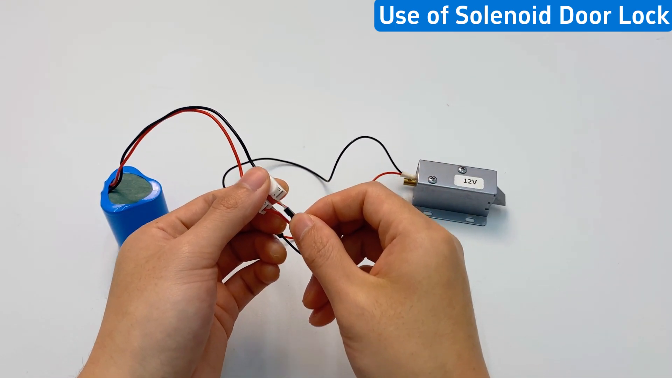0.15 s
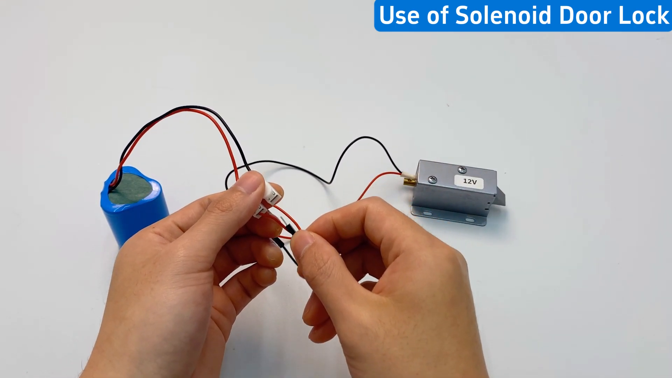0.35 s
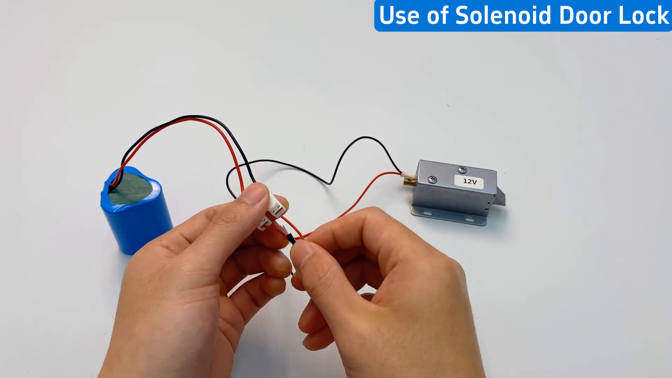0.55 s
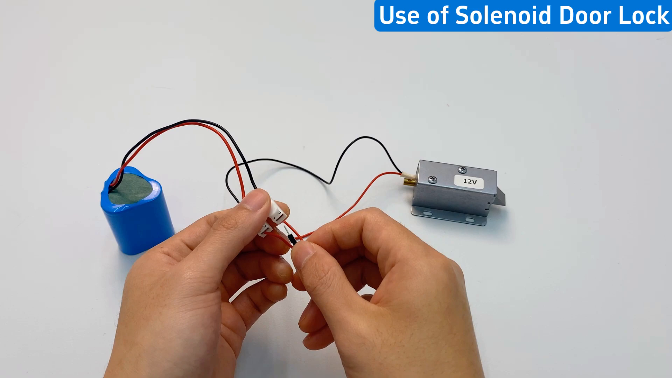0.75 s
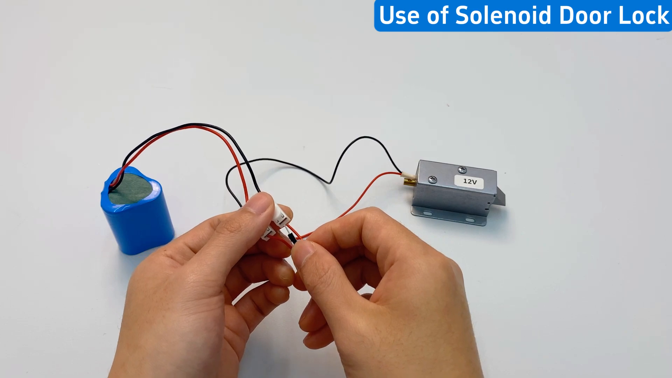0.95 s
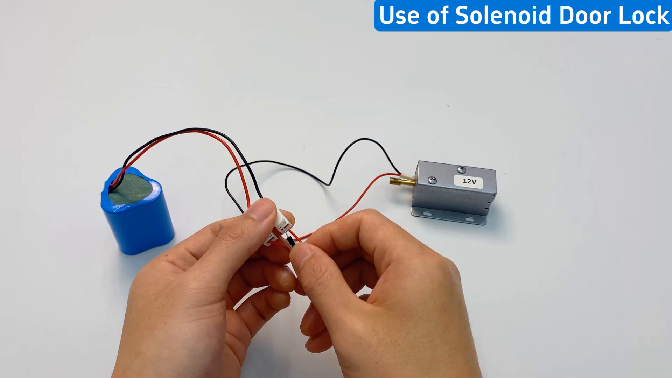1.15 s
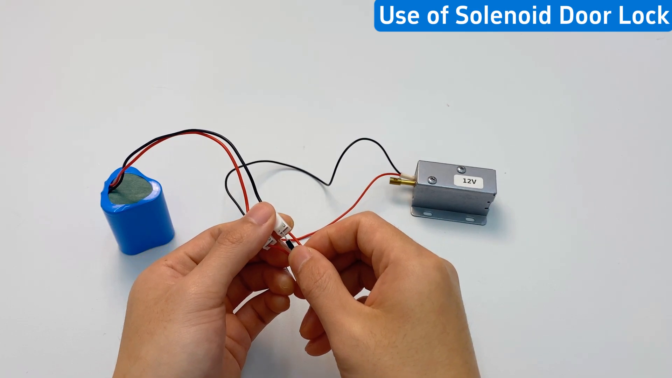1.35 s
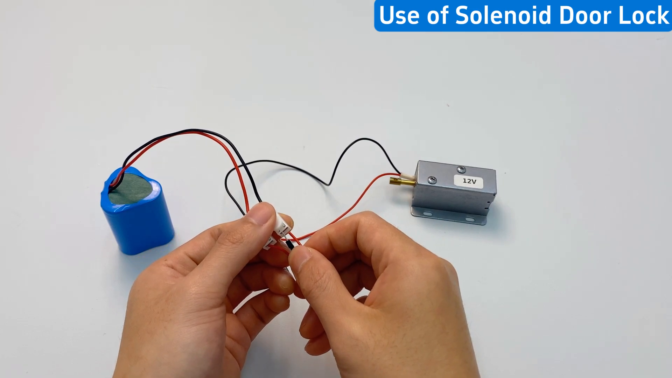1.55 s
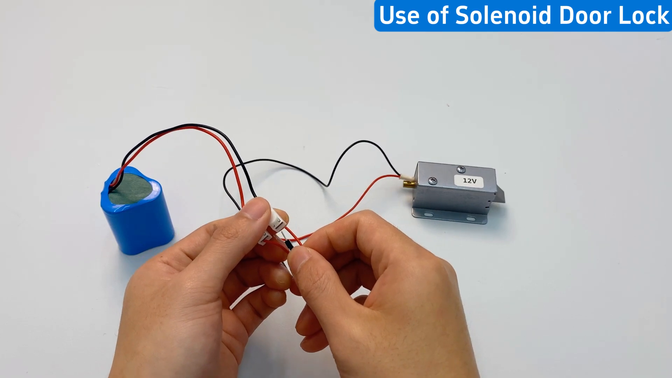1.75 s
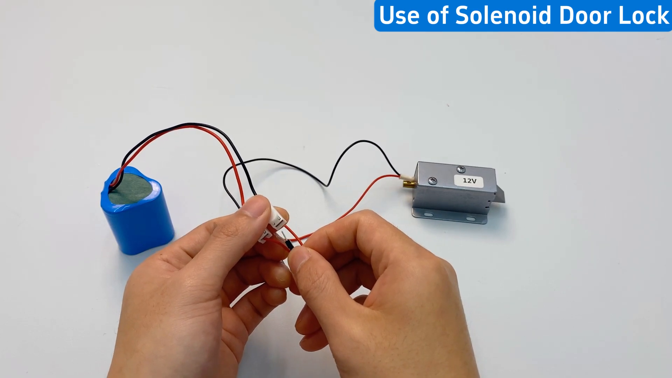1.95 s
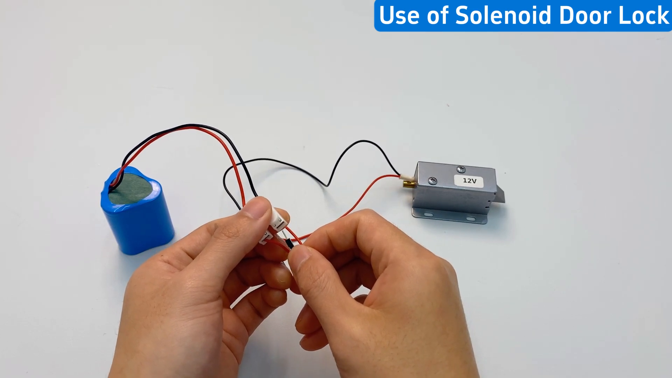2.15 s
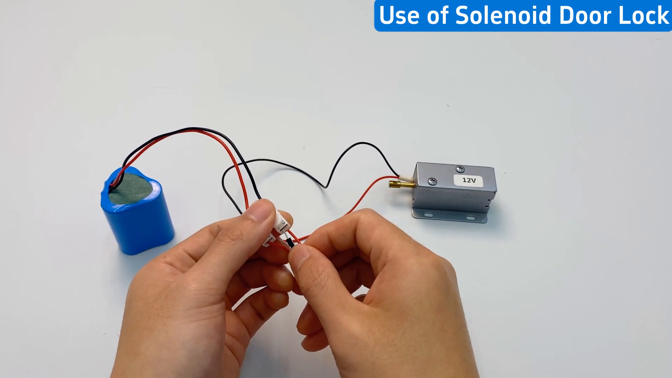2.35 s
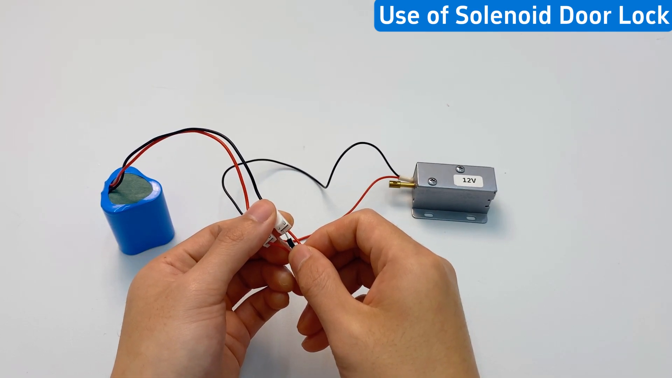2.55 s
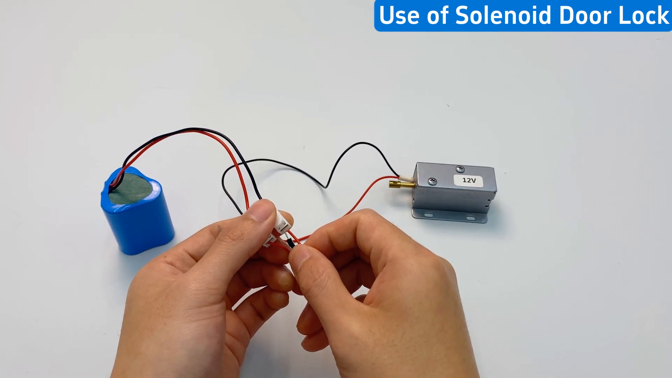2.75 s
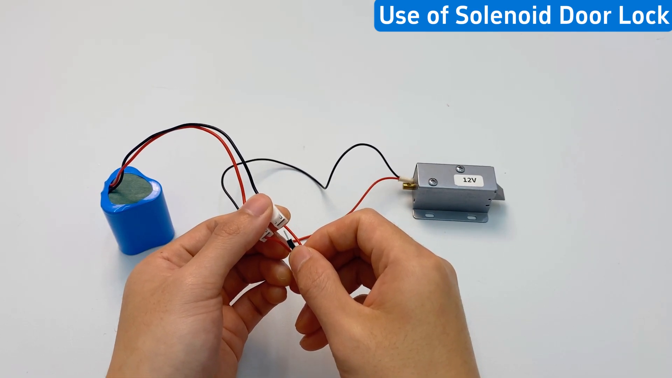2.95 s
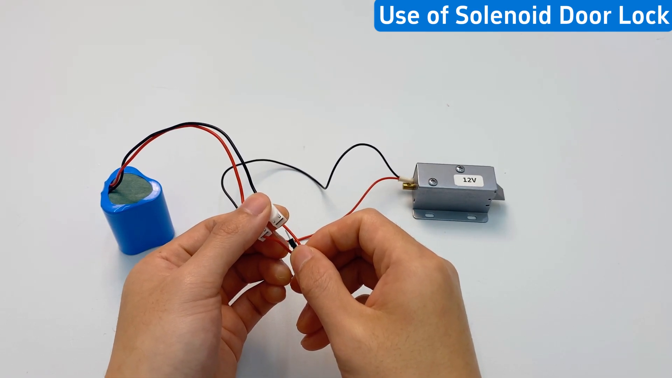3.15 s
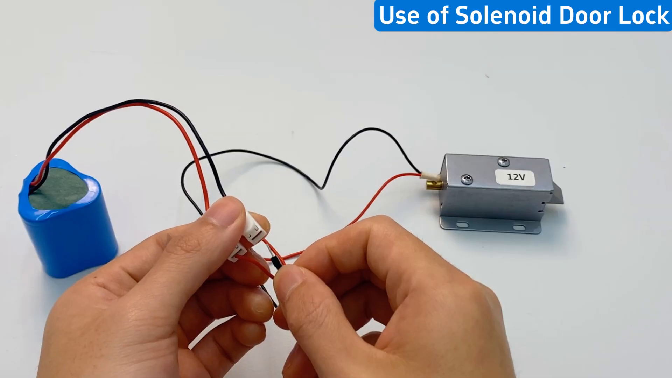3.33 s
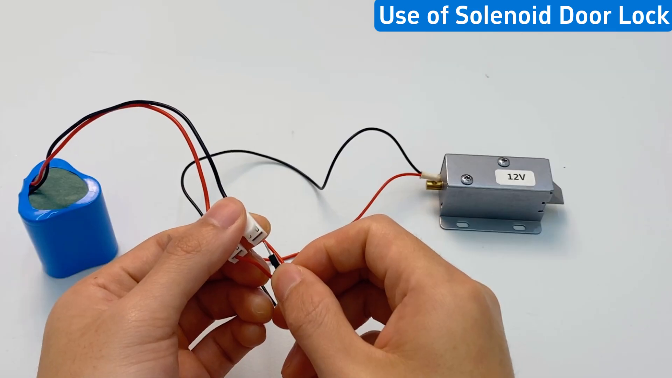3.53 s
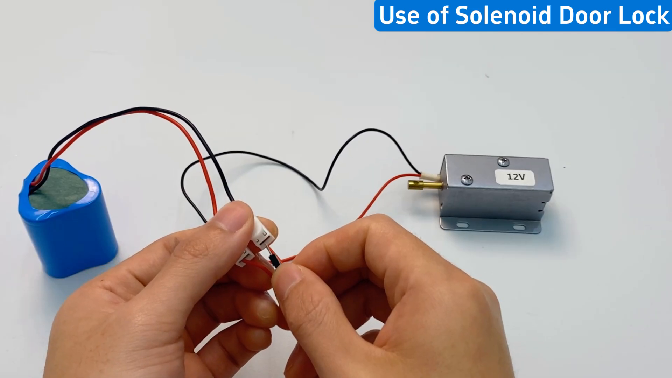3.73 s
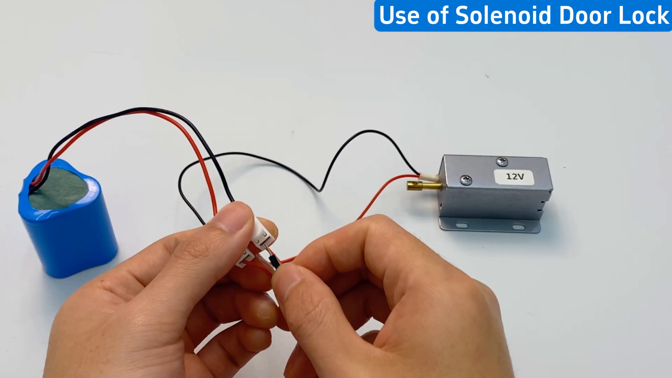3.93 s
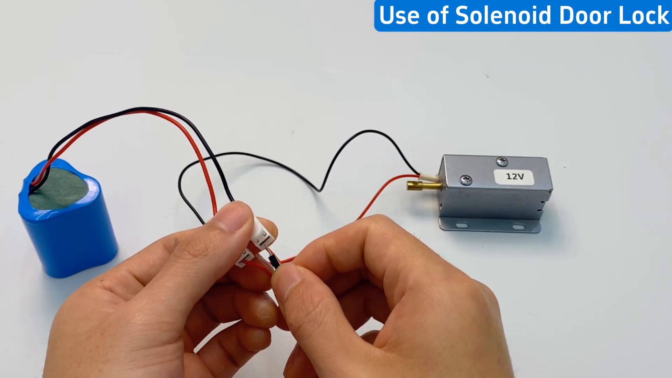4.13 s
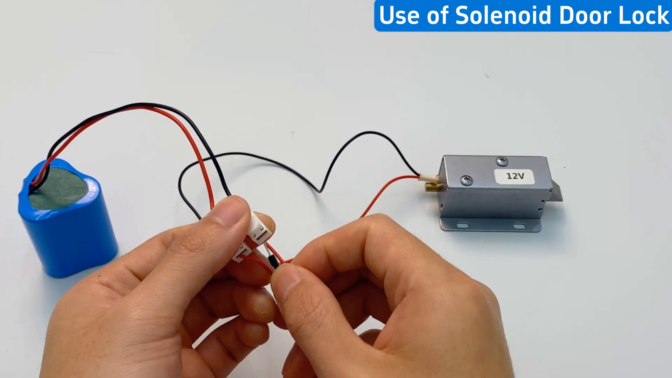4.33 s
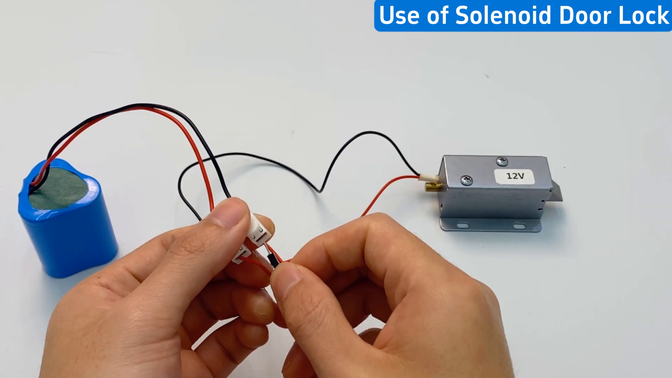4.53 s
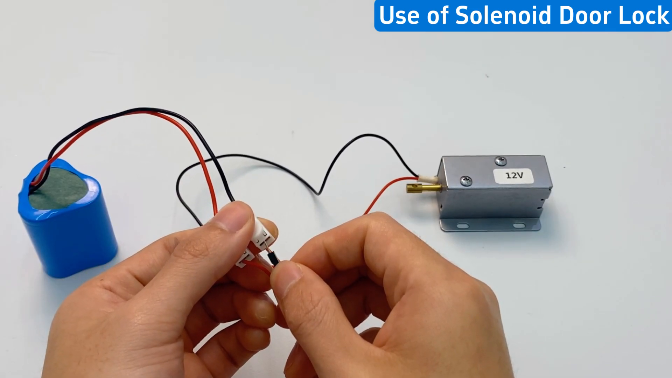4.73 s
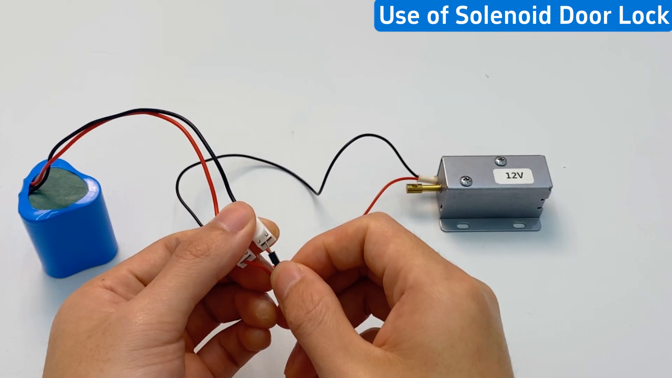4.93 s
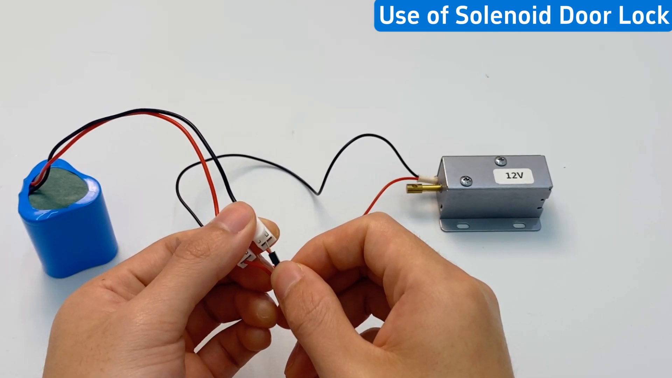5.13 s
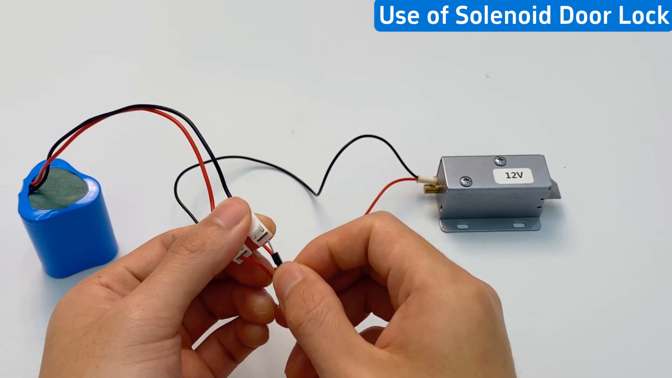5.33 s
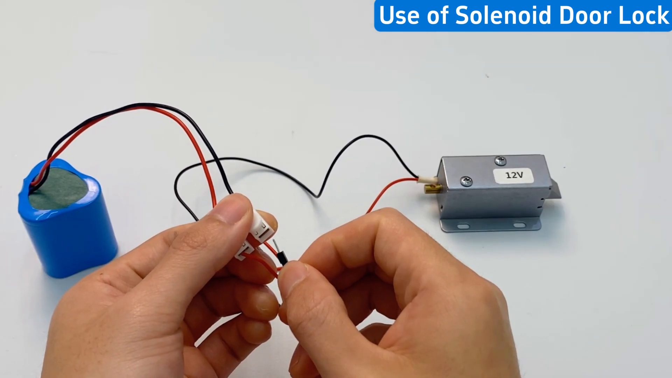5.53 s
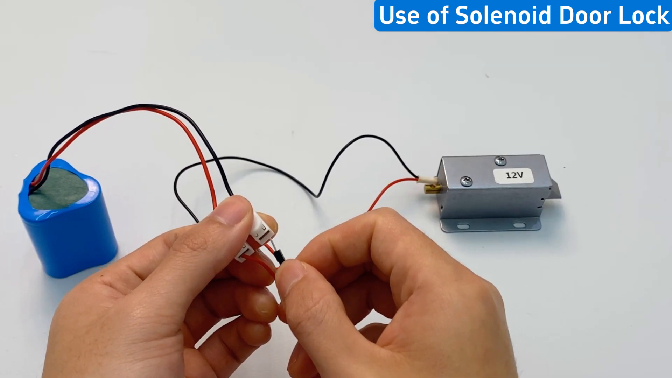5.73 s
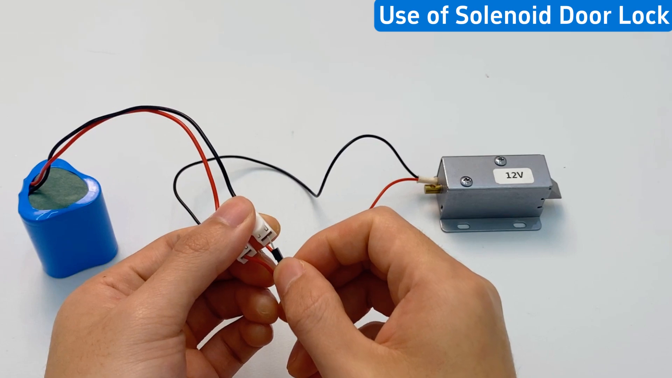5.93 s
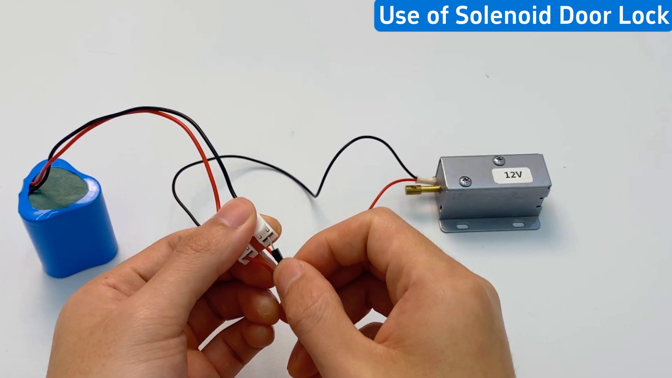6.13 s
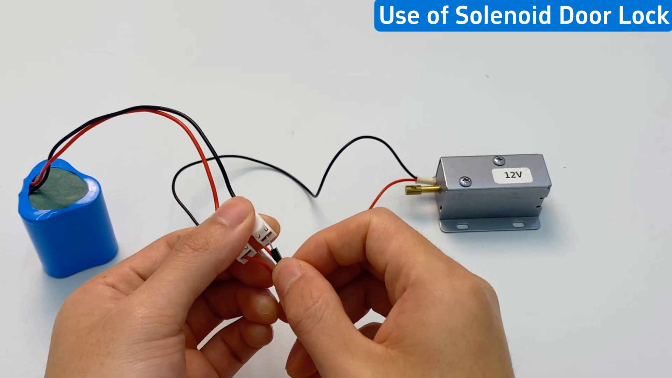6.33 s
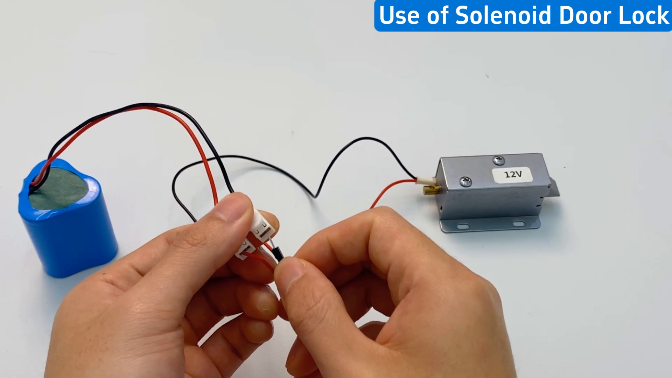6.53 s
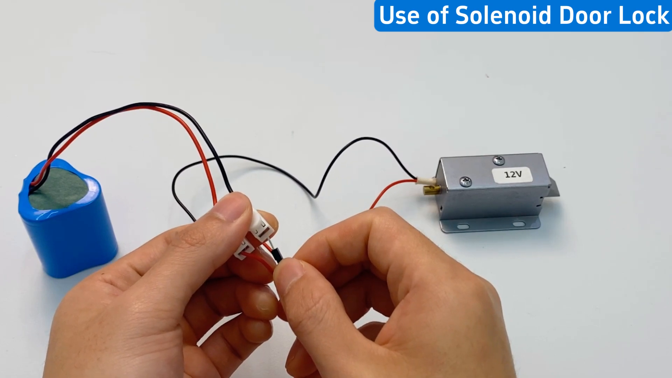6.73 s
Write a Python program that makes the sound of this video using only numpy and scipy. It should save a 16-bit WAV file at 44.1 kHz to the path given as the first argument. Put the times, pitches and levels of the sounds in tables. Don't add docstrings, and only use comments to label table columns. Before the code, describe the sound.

Crisp loud metallic snaps from a little electric lock alternate with softer spring-back knocks, each with a short room tail over very faint traffic rumble.

```python
import sys
import numpy as np
from scipy import signal
from scipy.fft import rfft, irfft
from scipy.io import wavfile
from scipy.ndimage import uniform_filter1d

SR = 44100
rng = np.random.default_rng(int(sys.argv[2]) if len(sys.argv) > 2 else 0)


def volts(x):
    e = np.asarray(x, float) / 20
    return 10 ** e


def to_wav(s):
    ch = np.atleast_2d(s).T
    pcm = np.round(np.clip(ch, -1, 1) * 32767)
    wavfile.write(sys.argv[1], SR, pcm.astype(np.int16))


N = 303408
SPAN = 8192
FFT_HZ = np.arange(SPAN // 2 + 1) * SR / SPAN

# start_s [s], crack_peak_db [dB], left_right_db [dB], bench_peak_db [dB],
# seating_db [dB] (how much the case lands flat rather than on a corner)
PULL_BLOWS = [
    (1.113, -5, -1.5, -34.5, 2),
    (2.299, -6, -6.5, -36.5, 4),
    (3.746, -5.5, -2, -34.5, 1.5),
    (4.725, -5.5, -5.5, -38.5, -3),
    (6.049, -4, -5.5, -32.5, 0.5),
]
# start_s [s], crack_peak_db [dB], left_right_db [dB], bench_peak_db [dB], seating_db [dB]
RELEASE_BLOWS = [
    (0.112, -6, -5.5, -32, -0.05),
    (1.687, -6.5, -4, -33, 0.6),
    (2.802, -5.5, -1.8, -33.5, -0.2),
    (4.183, -6, -2, -33, -0.16),
    (5.338, -6.5, -5, -34, -0.6),
    (6.469, -7.5, -3.5, -35.5, -0.1),
]
# start_s [s], tick_peak_db [dB], early_slide_db [dB], late_slide_db [dB]
UNSTICKING = [
    (0.0762, -33.5, -43, -38.5),
    (1.6513, -32, -45, -39.5),
    (2.7662, -35, -37, -36.5),
    (4.147, -31, -54.5, -39.5),
    (5.303, -37.5, -50.5, -45),
    (6.434, -34, -39, -38),
]
# frequency_hz [Hz], left_right_likeness [0 to 1
TRAFFIC_LIKENESS = [(60, 0.51), (240, 0.86), (950, -0.95), (3770, 0.01), (15000, 0.01)]


def at_hz(points, hz, column=1):
    rows = np.array(points)
    return np.interp(np.log(np.maximum(hz, 1)), np.log(rows[:, 0]), rows[:, column])


def rms_one(x):
    return x / np.sqrt(np.mean(x ** 2) + 1e-20)


def add(out, sound, s):
    i = round(s * SR)
    out[..., i:i + sound.shape[-1]] += sound[..., :N - i]


def coloured(x, db):
    cepstrum = irfft(db * np.log(10) / 20)
    cepstrum[1:SPAN // 2] *= 2
    cepstrum[SPAN // 2 + 1:] = 0
    return irfft(rfft(x, SPAN) * np.exp(rfft(cepstrum)))


def contacts(envelope, spread_db, even=0.61):
    size_db = spread_db * np.minimum(rng.exponential(1, SPAN), 4)
    hits = volts(size_db) * rng.standard_normal(SPAN)
    spectrum = rfft(hits * envelope)
    level = np.sqrt(uniform_filter1d(np.abs(spectrum) ** 2, size=40))
    return irfft(spectrum / level ** even) * (envelope > 1e-4)


def ringing(hz, db, t60, swell):
    t = np.arange(3 * SPAN)[:, None] / SR
    phase = 2 * np.pi * rng.random(len(hz))
    rise = 1 - np.exp(-(t / swell) ** 2)
    modes = volts(db - 60 * t / t60) * rise * np.sin(2 * np.pi * hz * t + phase)
    return modes.sum(axis=1)


def band_pairs(length, lowest_hz):
    edges = lowest_hz * 2 ** np.arange(0, np.log2(19000 / lowest_hz), 1 / 3)
    white = rng.standard_normal((2, 2, length))
    for k, (low, high) in enumerate(zip(edges, edges[1:])):
        band = signal.butter(2, [low, high], "band", fs=SR, output="sos")
        yield np.sqrt(low * high), signal.sosfilt(band, white[k % 2])


def spread(pair, alike):
    alike = np.clip(alike, 0, 1)
    middle = np.sqrt(1 + alike) * pair[0]
    side = np.sqrt(1 - alike) * pair[1]
    return middle + side * [[1], [-1]]


def drift(rate):
    points = rng.standard_normal(int(N / SR * rate) + 2)
    return np.interp(np.arange(N) / SR * rate, np.arange(len(points)), points)


def blows(table, column, crack, body, rise_s, fall_s, crack_db, scrape_db, scrape_s, knock_db, top_db):
    # frequency_hz [Hz], width_hz
    # [Hz], pull_rise_db [dB], release_rise_db [dB]
    case_modes = np.array([(1120, 280, 4, 5.5), (1390, 110, 6.5, 2.5), (1773, 120, 5, 4.5),
                           (2390, 690, 1.5, 5.5), (3390, 78, 4.5, 1.5), (3600, 140, 7.5, 3),
                           (4080, 240, 4, 1), (4990, 150, 5, 8), (6350, 80, 1, 5), (6540, 180, 7, 6.5),
                           (11800, 440, 4.5, 2), (13000, 540, -9.5, -12.5), (15100, 700, 5.5, 6),
                           (15450, 700, 2.5, 6.5)])
    direct, steel = np.zeros((2, N)), np.zeros(N)
    lead = 0.03
    t = np.arange(SPAN) / SR - lead
    resonances = 1 / (1 + (2 * (FFT_HZ[:, None] - case_modes[:, 0]) / case_modes[:, 1]) ** 2)
    envelope = np.exp(np.where(t < 0, t / rise_s, -t / fall_s))
    envelope += volts(scrape_db) * np.exp(np.minimum(t, 0) / scrape_s) * (t < 0)
    tilt_db = at_hz([(1500, knock_db), (3000, 0), (7000, 0), (11000, top_db)], FFT_HZ)
    for s, peak_db, pan_db, *_ in table:
        ring_db = resonances @ (case_modes[:, column] + rng.normal(0, 1.5, len(case_modes)))
        crack_colour_db = at_hz(crack, FFT_HZ) + tilt_db + 0.7 * ring_db
        near = coloured(contacts(envelope, 3.0), crack_colour_db)
        other = coloured(contacts(envelope, 3.0), crack_colour_db)
        crack_pair = spread(np.array([near, other]), 0.78) / np.abs(near).max()
        pan = volts(np.array([[0.5], [-0.5]]) * pan_db)
        add(direct, pan * volts(peak_db + crack_db) * crack_pair, s + 0.0013 - lead)
        shock = contacts(envelope, 3.0, even=0.8)
        shock = shock / np.sqrt(np.sum(shock ** 2))
        case_ring = coloured(shock, at_hz(body, FFT_HZ) + tilt_db + ring_db)
        add(steel, volts(12.5) * case_ring, s + 0.0012 - lead)
    return direct, steel


def pull_in():
    # frequency_hz [Hz], level_db [dB per Hz]
    crack = [(180, -49), (300, -20.5), (979, -22.5), (2980, -17), (3780, -2), (5480, -18.5), (6830, -6.5),
             (7690, -10.5), (9410, -18.5), (11700, -3), (14400, -17), (15600, -9), (17000, -44)]
    # frequency_hz [Hz], level_db [dB per Hz]
    body = [(240, -42.5), (400, -20), (831, -16.5), (1430, -18), (2020, -22.5), (3590, -1.5), (5140, -4.5),
            (5550, -10), (6590, 5), (7350, -9.5), (11900, -12.5), (13500, -22), (15500, -15),
            (16500, -33.5)]
    return blows(PULL_BLOWS, column=2, crack=crack, body=body, rise_s=0.00034, fall_s=0.0014, crack_db=1.55,
                 scrape_db=-26.5, scrape_s=0.004, knock_db=5, top_db=0.26)


def spring_back():
    # frequency_hz [Hz], level_db [dB per Hz]
    crack = [(180, -31.5), (300, -3), (698, -15.5), (1650, -5), (3040, -12), (3650, -5), (4950, -7),
             (5970, -15), (8800, -11), (11700, -3), (14400, -16), (15900, -17), (17000, -57)]
    # frequency_hz [Hz], level_db [dB per Hz]
    body = [(240, -37), (400, -14.5), (600, -8), (831, -12.5), (1290, -6), (2840, -16), (3590, 1),
            (5460, -8.5), (6590, -5), (7350, -9.5), (11900, -11), (13300, -30), (15500, -16),
            (16500, -41.5)]
    return blows(RELEASE_BLOWS, column=3, crack=crack, body=body, rise_s=0.00086, fall_s=0.0031, crack_db=-2.0,
                 scrape_db=-22.0, scrape_s=0.0022, knock_db=1.47, top_db=-1.5)


def let_go():
    # frequency_hz [Hz], level_db [dB per Hz]
    tick_colour = [(530, -41.5), (900, -10), (1270, -16.5), (1950, -6), (2970, -20.5), (4970, -1),
                   (5760, -1.5), (6760, -11.5), (8970, -10), (11200, 0.5), (13100, -15), (15400, -17),
                   (17000, -33.5)]
    # frequency_hz [Hz], level_db [dB per Hz]
    slide_colour = [(530, -33), (900, 2.5), (3080, -5.5), (4400, 5), (6050, -20.5), (7100, -6), (9660, -19),
                    (11900, -6), (13800, -25), (15400, -19.5), (17000, -63.5)]
    out, t = np.zeros(N), np.arange(SPAN) / SR
    snap = np.minimum(t / 0.0009, 1) ** 2 * np.exp(-t / 0.0019)
    for s, peak_db, early_db, late_db in UNSTICKING:
        tick = coloured(contacts(snap, 1.9), at_hz(tick_colour, FFT_HZ))
        early = volts(early_db) * np.exp(-((t - 0.0145) / 0.0024) ** 2)
        late = volts(late_db) * np.exp(-((t - 0.0245) / 0.005) ** 2)
        stroke = early + late
        slide = coloured(contacts(stroke, 3.5, even=0.4), at_hz(slide_colour, FFT_HZ))
        add(out, volts(peak_db + 1.5) * tick / np.abs(tick).max(), s)
        add(out, volts(4.5) * stroke.max() * slide / np.abs(slide).max(), s)
    return out


def bench(table, shares_db, column, thud_db):
    # frequency_hz [Hz], pull_db [dB], release_db [dB], t60_s [s], swell_s [s]
    bench_modes = np.array([(32.8, -19, -15, 0.1, 0.0049), (57, -20.5, -23, 0.7, .03),
                            (76.5, -9, -8, 0.1, 0.0033), (96.7, -9.5, -10, 0.25, 0.035),
                            (104.1, -2.5, -2, 0.58, 0.05), (120, -11.5, -10.5, 0.48, 0.013),
                            (153.6, -11.5, -7.5, 0.48, 0.016), (157.6, -7, -6, 0.48, 0.011),
                            (197.3, -7, -3, .25, 0.0067), (225, -7.5, -7, .25, .006),
                            (278.7, -12, -12, 0.23, 0.011), (320, -17, -16, 0.49, 0.011),
                            (355, -14, -9.5, 0.26, 0.0032), (384, 0, -9.5, 0.069, 0.0036)])
    # share [dB per dB] of deep, middle, upper
    seating_shares = np.array([-0.81, 1, -0.4])
    out = np.zeros((2, N))
    hz, t60, swell, level_db = bench_modes[:, [0, 3, 4, column]].T
    for s, _, _, peak_db, seating_db in table:
        deep_db, middle_db, upper_db = shares_db + seating_db * seating_shares
        share_db = deep_db * (hz < 135) + middle_db * (hz > 185) * (hz < 250) + upper_db * (hz > 250)
        thud, sway = (ringing(hz, level_db + share_db + rng.normal(0, 1.5, len(hz)), t60, swell)
                      for _ in range(2))
        pair = spread(np.array([thud, sway]), 0.85) * volts([[-1.2], [1.2]])
        add(out, volts(peak_db + thud_db) * pair, s + 0.0008)
    return out


def nudge():
    out, t = np.zeros(N), np.arange(SPAN) / SR
    sway = np.interp(t, [0.01, 0.024, 0.036, 0.042], [0.065, 0.14, 1.0, 0.096])
    tones = np.sin(2 * np.pi * 165 * t) + 0.5 * np.sin(2 * np.pi * 235 * t)
    for s, _, _, late_db in UNSTICKING:
        add(out, volts(0.37 * late_db - 18.0) * sway * tones, s)
    before = np.arange(-0.03, 0, 1 / SR)
    rock = volts(-37) * np.exp(before / 0.0065) * np.sin(2 * np.pi * 290 * before)
    for s, *_ in PULL_BLOWS:
        add(out, rock, s + before[0])
    return out


def room(x, wet_db):
    # frequency_hz [Hz], t60_s [s], level_db [dB], left_right_likeness [0 to 1]
    decay = [(150, 1, 7, 0.98), (395, 0.27, 6.5, 0.3), (1000, 0.33, -1.5, 0.26), (2160, 0.47, -2, 0.12),
             (3670, 0.44, -3.5, 0.06), (7004, 0.45, -6.5, .02), (9720, 0.34, -2, 0.022),
             (12000, 0.38, -4.5, .02), (16500, 0.3, -1, .02)]
    t, echo = np.arange(SR) / SR, 0
    for hz, pair in band_pairs(SR, lowest_hz=120):
        level_db = at_hz(decay, hz, column=2) - 60 * t / at_hz(decay, hz)
        echo = echo + spread(pair, at_hz(decay, hz, column=3)) * volts(level_db)
    echo = echo * np.clip((t - 0.003) / 0.0022, 0, 1)
    echo /= np.sqrt(np.sum(echo ** 2) / 2)
    return volts(wet_db) * signal.fftconvolve(x[None], echo, axes=1)[:, :N]


def road():
    # frequency_hz [Hz], level_db [dB per Hz]
    colour = [(20, -32.5), (32, -27), (50, -10.5), (75, -17.5), (108, -6.5), (140, -14.5), (230, -15),
              (320, -20), (450, -21), (620, -18.5), (970, -15), (1400, -23), (1940, -41.5), (12000, -60)]
    # centre_s [s], rise_db [dB], half_length_s [s]
    passes = [
        (0.25, 4, 0.2),
        (1.2, 6.5, 0.16),
        (1.9, 8, 0.36),
        (2.35, 6, 0.14),
        (3.05, 3.5, 0.2),
        (4.9, 3.5, 0.069),
        (6.0, 6, 0.55),
    ]
    t, noise = np.arange(N) / SR, 0
    for hz, pair in band_pairs(N, lowest_hz=20):
        waver_db = 2.8 * drift(11) + 1.1 * drift(3)
        noise = noise + spread(pair, at_hz(TRAFFIC_LIKENESS, hz)) * volts(at_hz(colour, hz) + waver_db)
    level_db = -65.5 + sum(db * np.exp(-((t - s) / half_s) ** 2) for s, db, half_s in passes)
    return volts(level_db + 2.5) * rms_one(noise)


def swish():
    # frequency_hz [Hz], level_db [dB per Hz]
    tyres = [(400, -32), (800, -5), (1250, 6), (1900, -9), (2700, -7), (3400, -30), (12000, -82)]
    start_s, level_db, attack_s, fade_db_per_s = 5.665, -62, 0.03, 22
    noise = 0
    for hz, pair in band_pairs(N, lowest_hz=20):
        if 300 < hz < 4000:
            noise = noise + spread(pair, at_hz(TRAFFIC_LIKENESS, hz)) * volts(at_hz(tyres, hz))
    noise = signal.sosfilt(signal.butter(8, 3000, fs=SR, output="sos"), noise)
    since = np.maximum(np.arange(N) / SR - start_s, 0)
    passing = np.minimum(since / attack_s, 1) * volts(level_db - fade_db_per_s * since)
    return passing * rms_one(noise)


def motor_hum():
    # frequency_hz [Hz], width_hz [Hz], level_db [dB]
    hum = [(104, 15, -69)]
    out = np.zeros(N)
    for hz, width_hz, db in hum:
        r = np.exp(-np.pi * width_hz / SR)
        poles = [1, -2 * r * np.cos(2 * np.pi * hz / SR), r * r]
        out += volts(db) * rms_one(signal.lfilter([1, 0, -1], poles, rng.standard_normal(N)))
    return out


def scene():
    pull, pull_steel = pull_in()
    back, back_steel = spring_back()
    ticks = let_go()
    thuds = bench(PULL_BLOWS, [-0.5, 2, 1.5], column=1, thud_db=5.5)
    thuds = thuds + bench(RELEASE_BLOWS, [-2.7, -0.45, -1.4], column=2, thud_db=7.0)
    echo = room(pull_steel + back_steel + volts(-5.5) * ticks, wet_db=3.5)
    return pull + back + ticks + thuds + nudge() + echo + road() + swish() + motor_hum()


def low_pass(x):
    return signal.sosfilt(signal.butter(12, 17150, fs=SR, output="sos"), x)


def record(dry):
    late = np.array([dry[0], np.roll(dry[1], 1)])
    soft = 0.7 * np.tanh(late / 0.7)
    mix = signal.sosfilt(signal.cheby2(10, 60, 17350, fs=SR, output="sos"), soft)
    return low_pass(mix)


dry = scene()
out = record(dry)
to_wav(out)
```